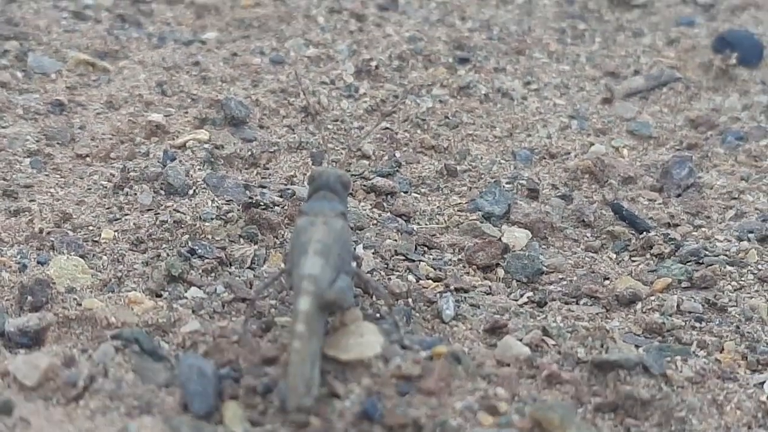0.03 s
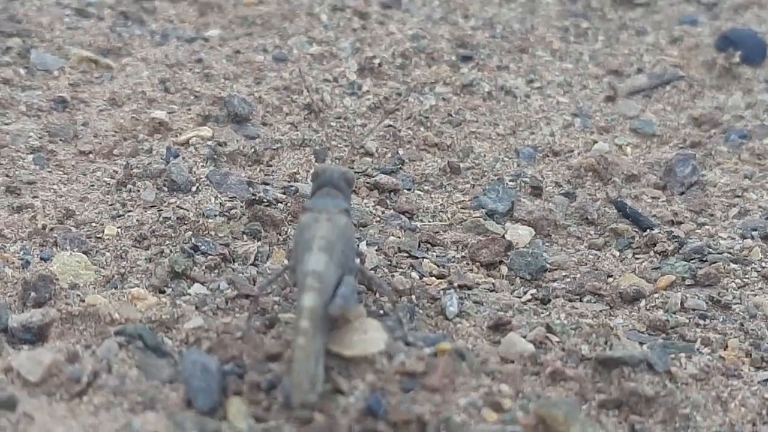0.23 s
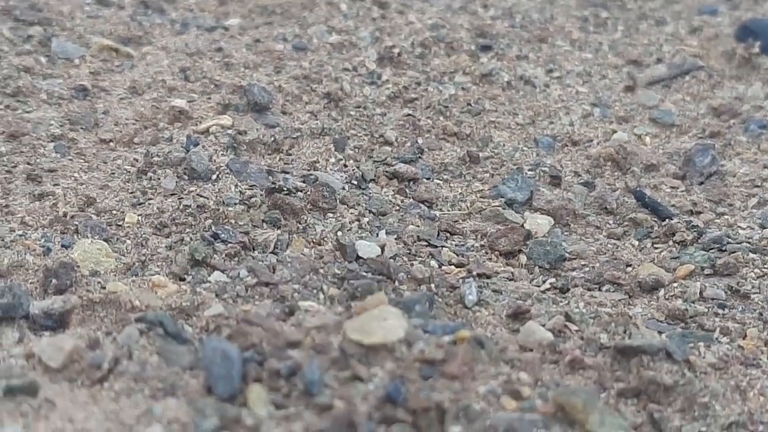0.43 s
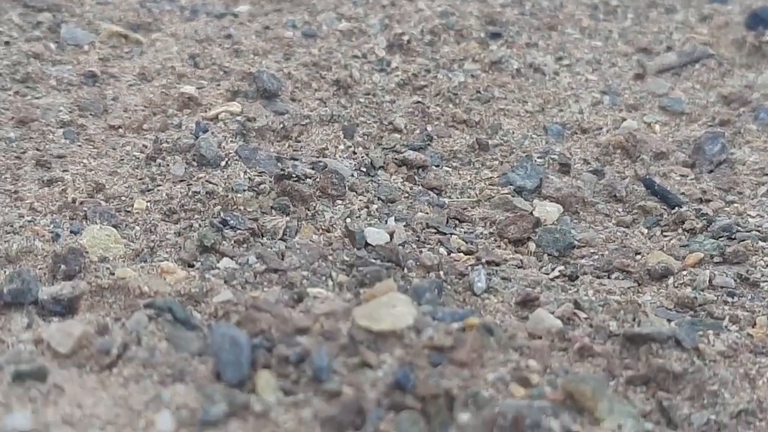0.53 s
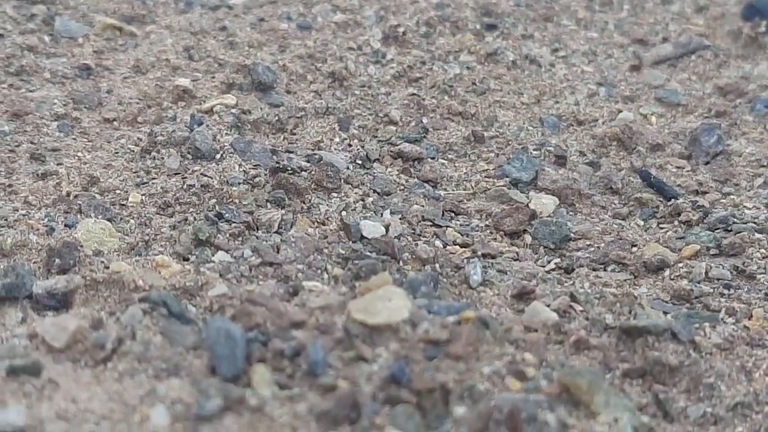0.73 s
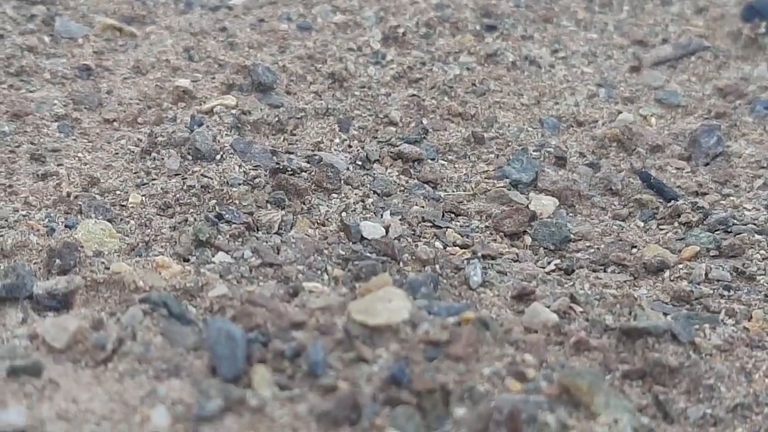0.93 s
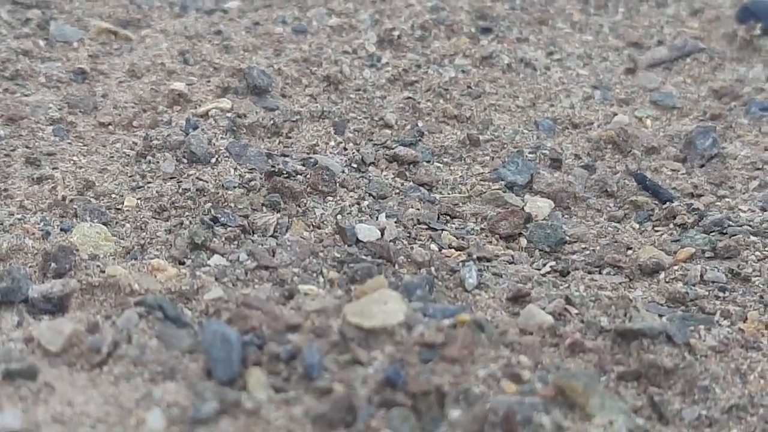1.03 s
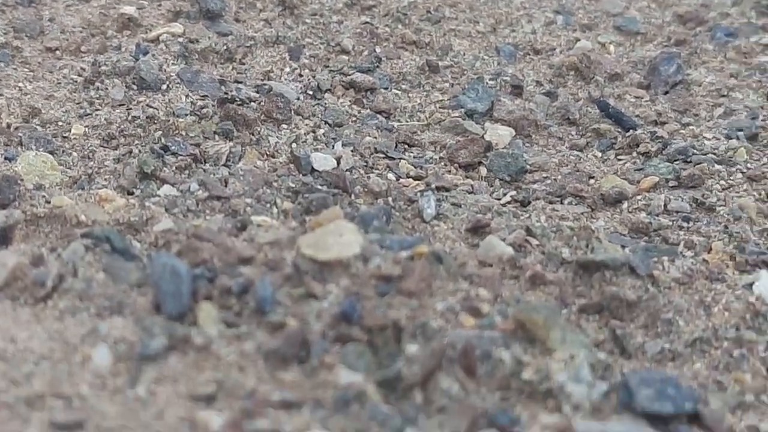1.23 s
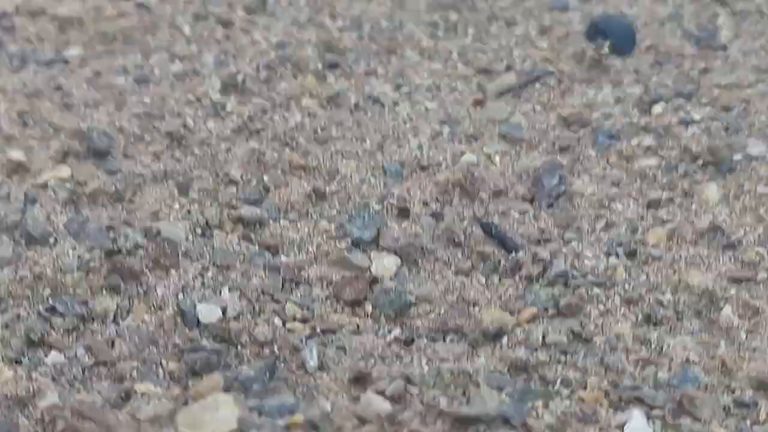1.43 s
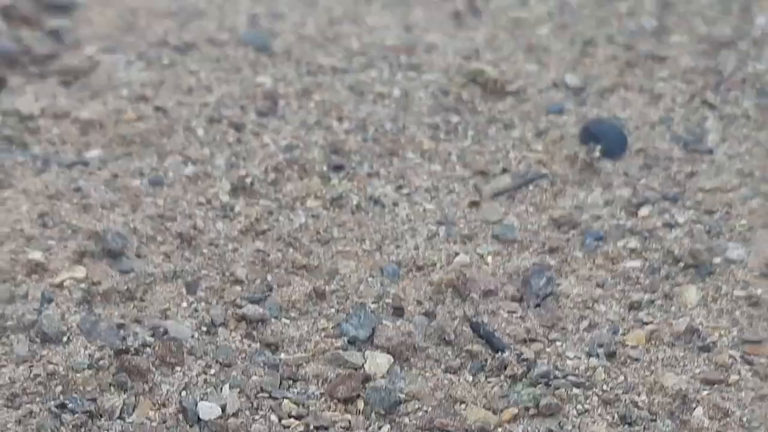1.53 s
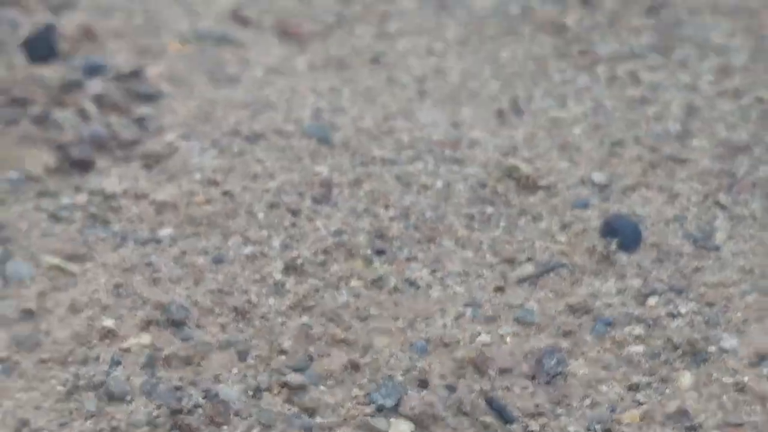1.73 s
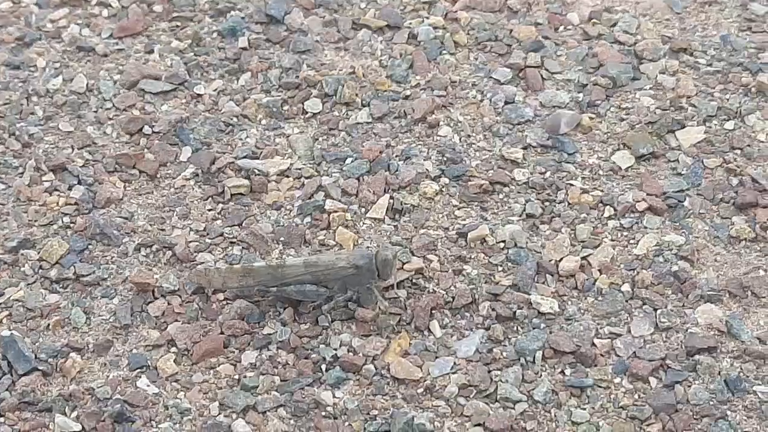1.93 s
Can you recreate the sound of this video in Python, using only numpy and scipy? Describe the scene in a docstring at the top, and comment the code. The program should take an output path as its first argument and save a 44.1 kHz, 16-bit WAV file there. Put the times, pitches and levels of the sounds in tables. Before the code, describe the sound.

A locust shuffles on dry gravel and takes off with a few papery flaps and sharp wing cracks, close to the microphone. Grit ticks afterwards, then one short scrape ends in a low thud. Light wind flutters outdoors.

```python
"""On dry gravel, a locust shuffles and takes off with a few papery flaps and sharp wing cracks, close by.
Grit ticks and snaps afterwards, then one gritty scrape swells and ends in a low thud.
Flaps, rustles and scrape are swells of tiny contacts; snaps and cracks are pulses that ring briefly;
thuds are damped low swings. Light wind flutters on the microphone ports, mostly on the right."""
import sys
import numpy as np
from scipy import signal
from scipy.fft import rfft, irfft, next_fast_len
from scipy.io import wavfile
from scipy.ndimage import uniform_filter1d, map_coordinates

SR = 44100
rng = np.random.default_rng(int(sys.argv[2]) if len(sys.argv) > 2 else 0)


def dump(signal):
    """Clip the signal to [-1, 1] and save it as 16-bit WAV at the path in sys.argv[1]."""
    limited = np.clip(np.atleast_2d(signal).T, -1, 1)
    pcm = np.round(limited * 32767).astype(np.int16)
    wavfile.write(sys.argv[1], SR, pcm)


N = 88200


def wings():
    """Each wing flap is a short swell of papery crackle."""
    # Each row: peak, rise and fall in seconds, level in dB, left over right in dB.
    flaps = [(.206, 0.006, 0.039, -35, -0.5), (.2205, 0.011, 0.0092, -15, -2),
             (.238, 0.011, 0.042, -35.5, -1), (.261, 0.026, 0.014, -34.5, 9.5),
             (.289, 0.011, 0.017, -46, 11.5)]
    # The papery tone. Each row: frequency in Hz, gain in dB.
    flap_tint = [(60, 7.5), (290, 4), (600, 7.5), (950, 8), (1850, -4), (2900, 1.5), (7000, -6),
                 (14000, -5)]
    return crackle(flaps, flap_tint, width=0.84, grains_per_s=2500)


def sharp_cracks():
    """The locust's wings crack at take-off, ringing briefly; one lone crack comes before and one after."""
    # Each row: start in seconds, level in dB, tilt in dB per octave, ring in Hz.
    cracks = [(0.0236, -10, -0.3, 3100), (0.2177, 1, -8.5, 990), (0.2366, 7, -1.86, 1900),
              (0.2414, 4.5, -3.5, 1900), (0.2592, -0.5, 0, 1370), (0.2669, 1, -2.8, 2750),
              (0.2888, -6, -6, 1000), (1.3249, -3, 0.3, 1750)]  # the wing cracks fall at 0.22-0.29 s
    return sum(snap(*row) for row in cracks)


def grit_snaps():
    """Sharp snaps of grit that share one stony ring."""
    # Each row: start in seconds, level in dB, tilt in dB per octave.
    snaps = [(0.0123, -27.5, 0.5), (0.034, -25.5, -3.5), (0.1227, -22, 2.5), (0.1314, -33, -8),
             (0.1353, -22, 6), (0.1431, -6.5, 2), (0.1545, -10.5, 2.5), (0.1656, -12, -1.5),
             (0.2054, -8, 1), (0.2134, -8, 0), (0.223, -4, -3), (0.2835, -16.5, -1), (0.3547, -29.5, -16),
             (0.4039, -27.5, -2), (0.582, -27, -3.5), (0.703, -38.5, -1), (0.743, -35.5, 1.5),
             (0.8981, -27, 1), (0.9448, -36.5, 3.5), (0.967, -19.5, 3.5), (0.9704, -21, 1),
             (1.0038, -18.5, -4), (1.0075, 1, 1), (1.0258, -13, -4), (1.112, -38.5, 4), (1.148, -31, 1),
             (1.1854, -22, -6.5), (1.1987, -30, 4), (1.2957, -21.5, 0), (1.3033, -28, -1.5),
             (1.3438, -11.5, -0.5), (1.355, -9.5, -3), (1.3706, -9, -0.5), (1.3731, -10, -4.5),
             (1.3819, -10, -2.5), (1.3872, -0.5, 1), (1.3925, -2.5, -8), (1.4174, -10.5, -7.5)]
    return sum(snap(*row, ring_hz=2970) for row in snaps)


def snap(start_s, db, tilt, ring_hz):
    """One sharp pulse with its own colour and ring, then a few milliseconds of noisy tail."""
    # Snaps and cracks drift leftwards. Each row: time in seconds, left over right in dB.
    drift = [(1.28, -1.5), (1.39, 10)]
    size, lead_s = 2048, .003
    ring_db, ring_width_oct = 3.5, 0.13
    tail_db, tail_t60_s = -12.5, .009
    out, hz, t = np.zeros((2, N)), np.fft.rfftfreq(size, 1 / SR), np.arange(size) / SR
    octaves = np.log2(np.maximum(hz, 900) / 2000)
    ring = ring_db / (1 + (np.log2((hz + 1) / ring_hz) / ring_width_oct) ** 2)
    pan_db = np.interp(start_s, *np.transpose(drift))
    pulse = tight_pulse(port_colour(hz) + tilt * octaves + ring) * amp([[pan_db], [0]])
    delay_s = lead_s + 0.00023 * hz / (2 * 8870)  # the treble arrives a little late
    pulse = irfft(rfft(pulse) * np.exp(-2j * np.pi * hz * delay_s))
    pulse *= np.cos(np.pi / 2 * t / t[-1]) ** 2
    tail = rng.standard_normal((2, size)) * amp(-60 * t / tail_t60_s)
    blow = amp(tail_db) * tail / np.linalg.norm(tail[0])
    blow[:, 0] = 1  # the first hard hit
    sound = signal.fftconvolve(pulse / np.linalg.norm(pulse), blow, axes=1)
    add(out, start_s - lead_s, amp(db + 0.5) * sound)
    return out


def gravel():
    """Loose grit rustles in sparse grains; one hard scrape has denser grains and a fuller body."""
    # Each row: peak, rise and fall in seconds, level in dB, left over right in dB.
    rustle_strokes = [(.024, 0.025, 0.063, -58.5, 6.5), (.155, 0.022, 0.024, -35.5, 5.5),
                      (.357, 0.03, 0.034, -65, 13), (.41, 0.079, 0.095, -58, -2.5),
                      (.582, 0.086, 0.082, -60, -8.5), (.775, 0.072, 0.049, -56, 0),
                      (.91, 0.045, 0.093, -61, 2), (1.015, 0.057, 0.11, -56.5, 4.5),
                      (1.18, 0.1, 0.14, -59, -0.5), (1.51, 0.1, 0.089, -69, 4),
                      (1.702, 0.0035, 0.062, -66.5, 3), (1.813, 0.0059, 0.063, -65.5, -4),
                      (1.852, .004, 0.033, -58.5, -0.5)]
    scrape_strokes = [(1.326, 0.0072, 0.079, -42.5, -14.5), (1.365, 0.044, 0.033, -35, -9),
                      (1.392, 0.012, 0.016, -24, 11), (1.404, 0.014, 0.018, -30.5, 13.5),
                      (1.419, .01, 0.005, -29, -17)]
    # Their tone. Each row: frequency in Hz, gain in dB.
    rustle_tint = [(450, 2.5), (900, 4.5), (1850, -3), (14000, -5.5)]
    scrape_tint = [(60, -17), (290, 11), (720, 10.5), (1850, -2), (4000, -1), (14000, -9.5)]
    rustle = crackle(rustle_strokes, rustle_tint, width=.8, grains_per_s=260)
    scrape = crackle(scrape_strokes, scrape_tint, width=1.57, grains_per_s=2500)
    return rustle + scrape


def crackle(strokes, tint, width, grains_per_s):
    """Tiny contacts of scattered size over a smooth rub, partly shared by both ports."""
    spread_db, rub_gain = 3.5, .45
    shape = (3, N)  # left, right, shared
    sizes = rng.choice([-1, 1], shape) * amp(spread_db * np.clip(rng.standard_normal(shape), -2, 2))
    grains = unit((rng.random(shape) < grains_per_s / SR) * sizes)
    friction = grains + rub_gain * rng.standard_normal(shape)
    stereo = friction[2] + width * friction[:2]
    coloured = filtered(stereo, lambda hz: amp(port_colour(hz) + along(tint, hz)))
    return swells(strokes) * unit(coloured) / np.sqrt(2)


def thuds():
    """Each dull thud is a heavily damped swing that falls in pitch as it dies."""
    # Each row: start in seconds, pitch in Hz, left level in dB, right level in dB.
    hits = [(0.022, 250, -54, -42), (0.148, 140, -72, -33.5), (0.204, 202.4, -49, -20.5),
            (0.236, 270, -27, -27), (0.268, 190, -27, -26.5), (0.286, 151, -38, -27.5),
            (1.007, 259, -41.5, -27.5), (1.3858, 585, -13, -26), (1.392, 165.6, -15.5, -26.5),
            (1.405, 280, -15, -43), (1.419, 138, -18.5, -28)]
    pitch_sag, attack_s = 0.2, .0015
    out, t = np.zeros((2, N)), np.arange(SR // 10) / SR
    for start_s, hz, left_db, right_db in hits:
        decay = np.exp(-t * hz)  # the time constant is one cycle
        falling_hz = hz * (1 - pitch_sag * (1 - decay))
        swing = np.sin(2 * np.pi * np.cumsum(falling_hz) / SR)
        attack = 1 - np.exp(-t / attack_s)
        add(out, start_s, amp([[left_db], [right_db]]) * swing * decay * attack)
    return out


def wind():
    """Low gusts flutter on the microphone ports, mostly on the right."""
    # The gusts. Each row: time in seconds, level in dB.
    gust_curve = [(0, -63), (.35, -53), (.41, -63), (.432, -41.5), (.49, -57), (.63, -56), (.69, -40),
                  (.78, -40), (.81, -62.5), (.95, -60), (1.04, -57), (1.14, -37.5), (1.21, -50),
                  (1.25, -44), (1.38, -51), (1.46, -54.5), (1.49, -46.5), (1.55, -60.5), (1.61, -47.5),
                  (1.68, -63.5), (1.71, -53), (1.77, -72), (1.81, -47), (1.91, -61.5), (1.94, -87)]
    # The rumble. Each row: frequency in Hz, gain in dB.
    rumble_colour = [(20, -31.5), (45, -14), (135, 3.5), (200, -5), (300, -15), (450, -30.5), (2000, -69.5),
                     (8000, -92)]
    flutter_db, flutter_per_s, left_db, top_hz = 4, 65, -16.5, 350
    t = np.arange(N) / SR
    flutter = map_coordinates(rng.standard_normal(size=400), [t * flutter_per_s], mode="wrap")
    level_db = np.interp(t, *np.transpose(gust_curve)) + flutter_db * flutter
    rumble = steadied(noise(rumble_colour), hold_s=0.02)
    gusts = amp(level_db) * amp([[left_db], [0]]) * rumble
    return low_pass(gusts, top_hz, order=5)


def outdoor_air():
    """A quiet bed of still air, with a faint high hiss that peaks after the scrape."""
    # The tone of each. Each row: frequency in Hz, gain in dB.
    air_colour = [(20, -9), (60, 0.5), (200, -2.5), (600, -15.5), (2000, -31), (8000, -32), (16000, -30.5)]
    hiss_colour = [(2500, -27), (5300, 0), (6600, -5), (8000, 2), (9800, -16.5), (13000, -10)]
    # One row: peak, rise and fall in seconds, level in dB, left over right in dB.
    hiss_swell = [(1.6, .5, 0.268, -73, -12)]
    return amp(-71) * noise(air_colour) + swells(hiss_swell) * noise(hiss_colour)


def port_colour(hz):
    """Colour in dB of close sounds at the left and right microphone port."""
    # Each row: frequency in Hz, gain in dB.
    left = [(40, -40), (550, -12), (900, -17.5), (1500, -26.5), (2200, -19.5), (3300, -13), (4800, -20.5),
            (6800, -23), (8000, -13), (9800, -30.5), (12500, -17), (16000, -22.5)]
    right = [(40, -18), (290, -4.5), (520, -15), (1100, -9), (1850, 2), (2900, -1.5), (4300, -10.5),
             (5600, -8), (6800, -16), (8000, -10.5), (9800, -31), (12500, -19), (16000, -28)]
    return np.array([along(left, hz), along(right, hz)])


def swells(strokes):
    """Left and right gain of strokes that move 20 dB over each rise and fall time."""
    t, power = np.arange(N) / SR, np.zeros((2, N))
    for peak_s, rise_s, fall_s, db, pan_db in strokes:
        drop_db = 20 * np.maximum((peak_s - t) / rise_s, (t - peak_s) / fall_s)
        power += (amp(db - drop_db) * amp([[pan_db], [0]])) ** 2
    return np.sqrt(power)


def tight_pulse(spectrum_db):
    """The tightest causal pulse with this spectrum (minimum phase)."""
    cepstrum = irfft(np.log(amp(spectrum_db)))
    half = cepstrum.shape[-1] // 2
    cepstrum[..., 1:half] *= 2
    cepstrum[..., half + 1:] = 0
    return irfft(np.exp(rfft(cepstrum)))


def noise(colour):
    """Coloured noise, independent left and right."""
    return unit(filtered(rng.standard_normal((2, N)), lambda hz: amp(along(colour, hz))))


def steadied(x, hold_s):
    """Noise with its chance swells evened out."""
    power = uniform_filter1d(x ** 2, int(hold_s * SR), axis=-1)
    return x / np.sqrt(np.abs(power) + 1e-12)


def filtered(x, response):
    """Equalise with a gain that depends on frequency."""
    size = next_fast_len(N + SR // 2)
    hz = np.fft.rfftfreq(size, 1 / SR)
    return irfft(rfft(x, size) * response(hz), size)[..., :N]


def low_pass(x, top_hz, order):
    """Roll off above top_hz at 6 dB per octave for each order."""
    return filtered(x, lambda hz: 1 / np.sqrt(1 + (hz / top_hz) ** (2 * order)))


def along(points, hz):
    """Read (Hz, value) points on a log frequency axis."""
    points_hz, values = np.transpose(points)
    return np.interp(np.log(hz + 1), np.log(points_hz + 1), values)


def amp(db):
    """Decibels to gain."""
    return 10 ** (np.asarray(db) / 20)


def unit(x):
    """Scale to rms 1."""
    return x / np.sqrt(np.mean(x ** 2) + 1e-20)


def add(track, start_s, sound):
    """Mix a sound in at its start time."""
    i = max(0, round(start_s * SR))
    track[:, i:i + sound.shape[1]] += sound[:, :max(0, N - i)]


def scene():
    """Locust and gravel are close and dry, over light wind and quiet air."""
    air = outdoor_air()
    return grit_snaps() + sharp_cracks() + wings() + gravel() + thuds() + wind() + air


def record(dry):
    """A steep cut takes off the very top of the treble."""
    return low_pass(dry, top_hz=16300, order=80)


dry = scene()
out = record(dry)
dump(out)
```